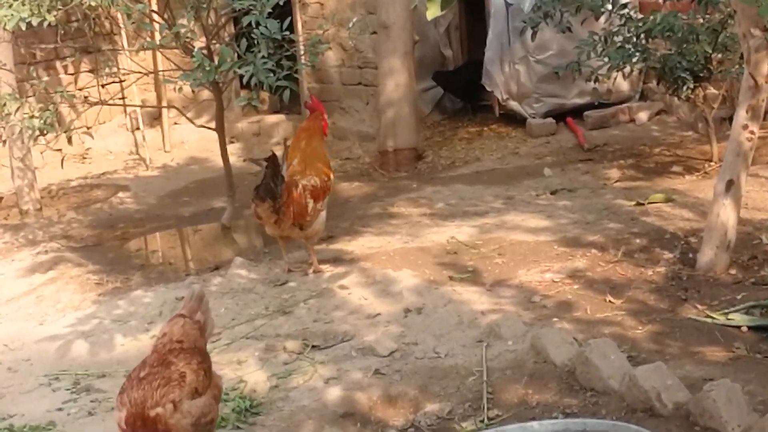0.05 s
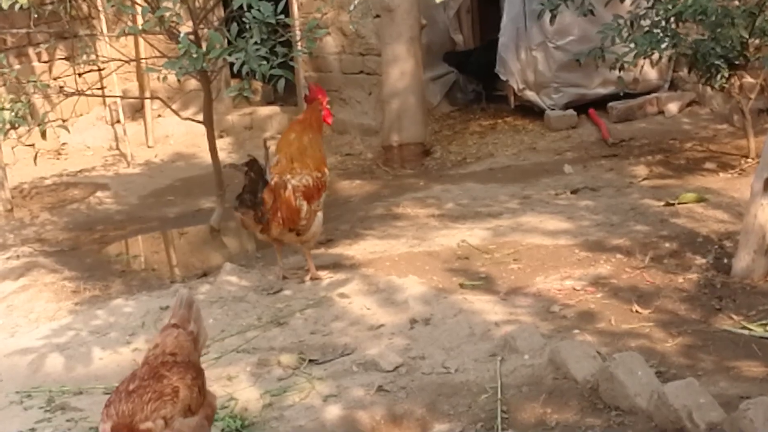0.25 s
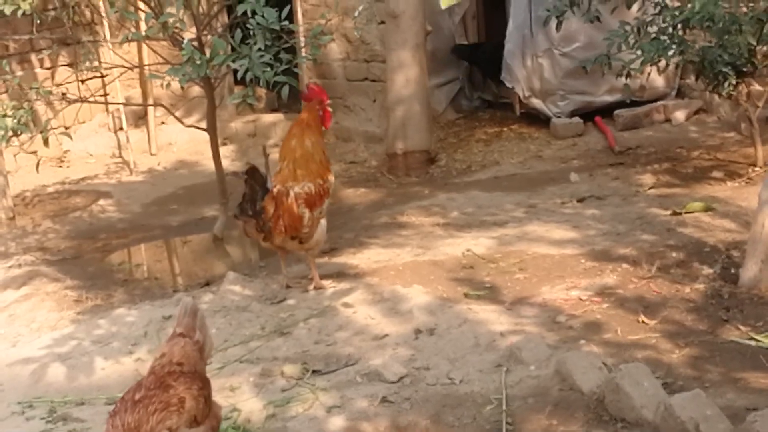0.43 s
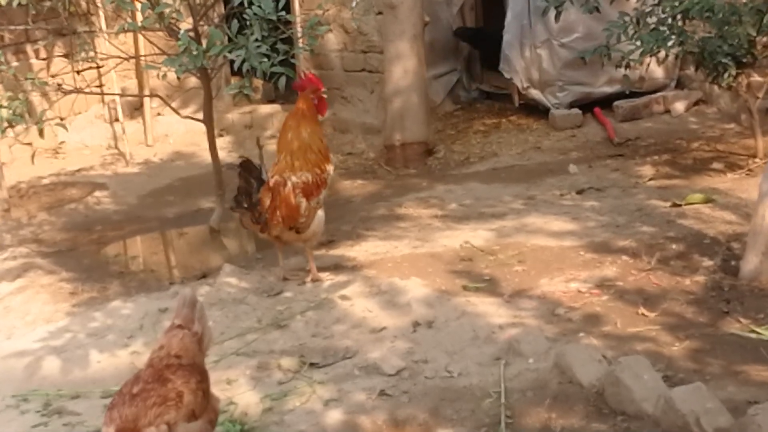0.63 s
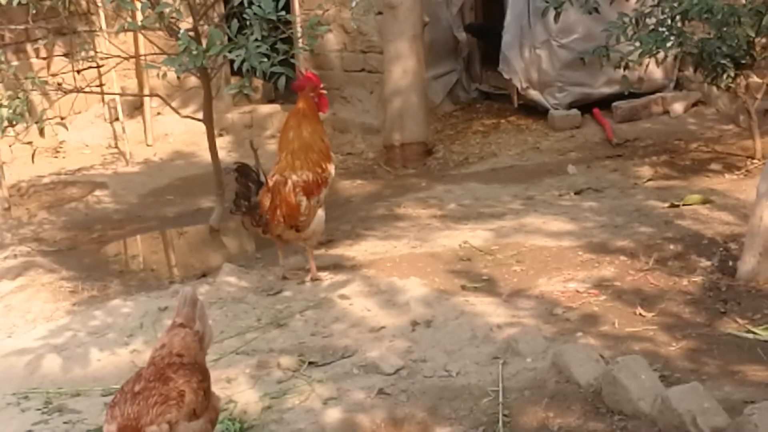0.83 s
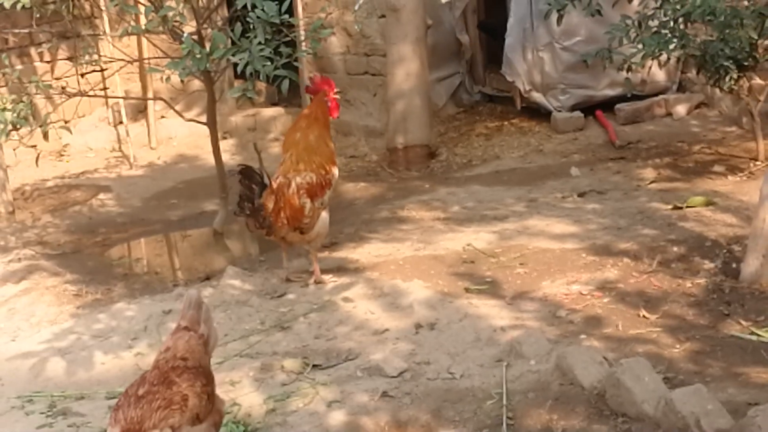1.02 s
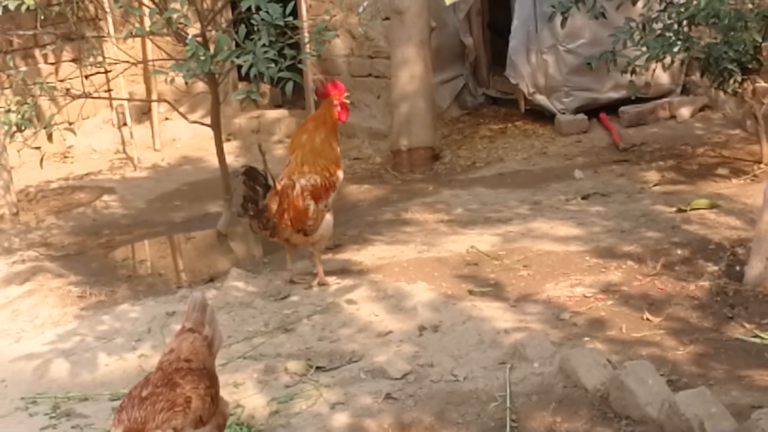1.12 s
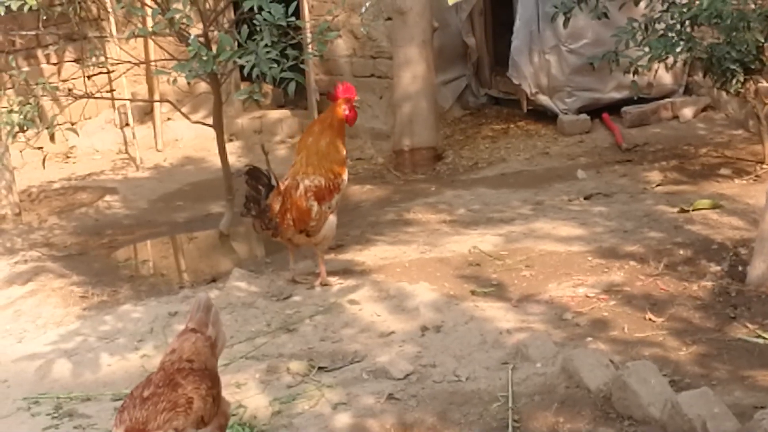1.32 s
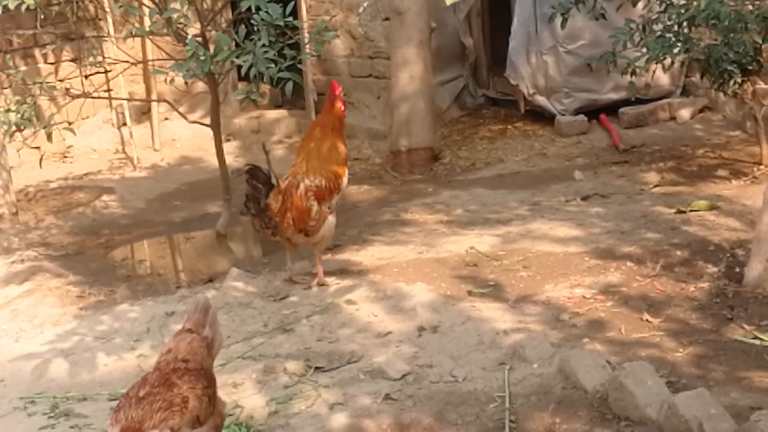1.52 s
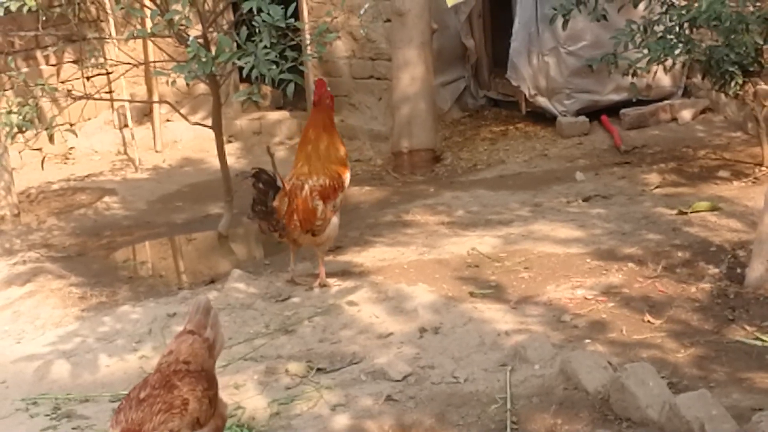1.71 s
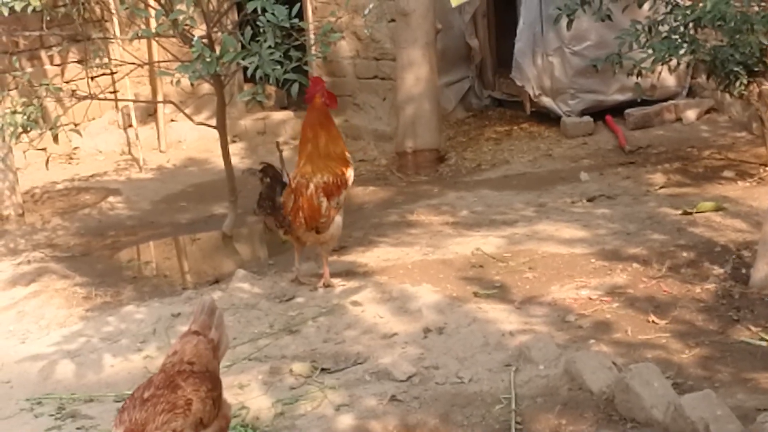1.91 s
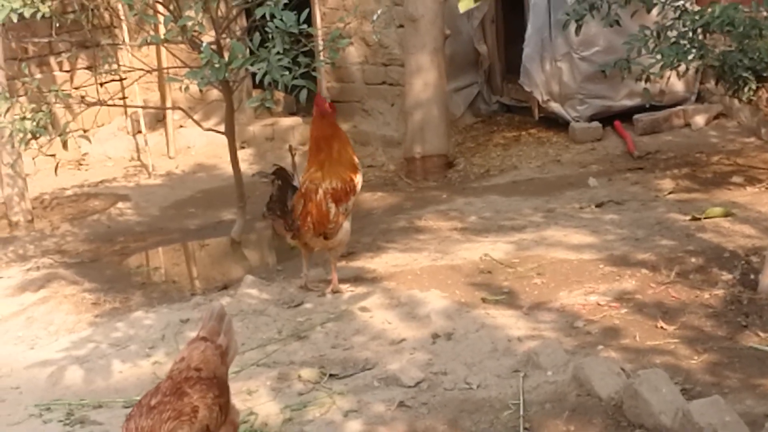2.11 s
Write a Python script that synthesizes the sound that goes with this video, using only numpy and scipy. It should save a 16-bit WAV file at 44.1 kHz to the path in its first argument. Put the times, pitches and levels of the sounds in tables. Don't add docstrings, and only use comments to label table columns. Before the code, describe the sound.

Close outdoor stereo pickup of a rooster's crow, short bark first, then a long strained call breaking hoarse, with short wall echoes, thin buzzy bird chirps at left, low wind rumble and a faint peck at the end.

```python
import sys
import numpy as np
from scipy import signal
from scipy.fft import rfft, irfft, next_fast_len
from scipy.io import wavfile
from scipy.ndimage import uniform_filter1d, map_coordinates

SR = 44100
rng = np.random.default_rng(int(sys.argv[2]) if len(sys.argv) > 2 else 0)


def boost(x):
    u = np.asarray(x, float) / 20
    return 10 ** u


def persist_wave(psi):
    counts = np.round(np.clip(psi, -1, 1) * 32767).astype(np.int16)
    wavfile.write(sys.argv[1], SR, np.atleast_2d(counts).T)


N = 94815

# frequency in Hz, level in dB per Hz.
AIR_COLOUR = [(15, -48), (25, -2), (144, -2), (300, -4.5), (600, -3), (1000, -10), (3500, -17),
              (15500, -23.5)]
# frequency in Hz, likeness 0-1.
AIR_ALIKE = [(40, .998), (90, .992), (180, .92), (350, .3), (1000, .1)]
# time in seconds, wind level in dB.
WIND_SWELL = [
    (0, 13.5),
    (.2, 1),
    (1.2, 3.5),
    (1.55, 8.5),
    (1.7, 3),
    (2.0, 5.5),
    (2.1, 15.5),
    (2.15, 14.5),
]
AIR_DB, WIND_TOP_HZ = -61.5, 160

# time in seconds, level in dB.
PECK_TIMES = [
    (0.073, -69),
    (2.073, -46.5),
]
# frequency in Hz, level in dB.
PECK_COLOUR = [(200, -65), (500, -20), (2200, -11), (3000, -34), (9000, -29.5), (15000, -56)]
PECK_T60_S = .05

# start in seconds, length in seconds, level in dB, pitch in Hz, low throat note in Hz.
CHIRPS = [
    (0.144, 0.074, -40.5, 10030, 4870),
    (0.242, 0.064, -37.5, 9640, 5070),
    (0.682, 0.066, -43.5, 10080, 4930),
    (1.275, 0.057, -34.5, 9490, 4745),
    (1.354, 0.061, -29.5, 9340, 3950),
    (1.435, 0.063, -30.5, 9196, 3720),
]
# frequency in Hz, level in dB.
BIRD_BREATH = [(2000, -97.5), (3200, -5.5), (5000, 2.5), (8000, 5), (9500, 16), (10500, -24), (11000, -59)]
RASP_DB, LOW_NOTE_DB = -14, -16.5
TRILL_HZ, TRILL_SWING_HZ, TRILL_DB = 65, 70, 1.5
BUZZ_HZ, GRAIN_DB, CHIRP_RISE_S = 260, 2.5, .012
SWOOP_HZ, SWOOP_S, HIGH_LATE_S = 900, .005, .008
BIRD_LEFT_DB, BIRD_WET_DB = 7, -3

# time in seconds, pitch in Hz, level in dB, beak opening from -1 to 2.
FIRST_NOTE = [(.226, 568, -39.5, 0.77), (.238, 605.5, -24.5, 0.66), (.275, 650.6, -21, 0.14),
              (.3, 701.2, -20.5, 0.24), (.325, 705.5, -24.5, 0.44), (.342, 668.3, -22, 0.39),
              (.39, 646.3, -21, 0.12), (.42, 600, -25.5, 0.11), (.44, 561.6, -32.5, 1)]
WAVER = [(.532, 508.5, -42.5, 1), (.546, 577.5, -26, 1.07), (.56, 729.7, -22.5, 1.6), (.578, 881, -27, 1.2),
         (.6, 906, -19.5, 1.1), (.635, 896, -23.5, 1.09), (.652, 785, -28.5, 1.24),
         (.668, 628.3, -27.5, 1.77), (.69, 621.5, -25.5, 0.43)]
SURGE = [(.705, 641.4, -24, 0.56), (.72, 764.4, -24.5, 0.27), (.74, 805, -24.5, .6),
         (.76, 881.4, -23.5, 0.74), (.785, 890, -26.5, 0.6)]
MIDDLE = [(.81, 883.4, -26, 0.37), (.84, 880.6, -25.5, 0.42), (.9, 902, -23, 0.34),
          (.955, 892.2, -25, 0.48), (.98, 873.6, -22.5, 0.1), (1.0, 856, -23, 0.22),
          (1.03, 852.4, -24.5, 0.68), (1.06, 868, -26, 0.64)]
LONG_CALL = [(1.085, 900.5, -24, 0.2), (1.17, 905.2, -24, -.95), (1.3, 896, -25.5, 0.4),
             (1.4, 883.6, -28, 0.07), (1.462, 880, -26.5, 0.5), (1.467, 837.7, -29, 2),
             (1.58, 836.7, -28, 1.5), (1.66, 847.9, -26, 1.26), (1.72, 836.6, -31.5, 1.33)]
DYING = [(1.764, 810, -30, 1.1), (1.765, 690, -26, .8), (1.8, 645, -27, .8), (1.825, 615, -27, .8),
         (1.845, 540, -26, .6), (1.852, 515, -40, .6), (1.86, 510, -30, .8)]
# start in seconds, end in seconds.
VOICED = [
    (0.227, 0.44),
    (0.532, 1.8515),
]
# start in seconds, end in seconds, chaos 0-1, quaver in cycles.
BREAKS = [(.22, .45, .008, .04), (.285, .335, .015, .06), (.53, .575, .1, .05), (.58, .72, .012, .025),
          (.64, .67, .1, .06), (.722, .805, .4, .18), (.8, .96, .012, .014), (1.0, 1.075, .4, .18),
          (1.07, 1.3, .008, .004), (1.63, 1.76, .02, .014), (1.765, 1.865, .05, .07)]
# start in seconds, end in
# seconds, depth 0-1, lateness in cycles.
HALVING = [
    (0.702, 0.79, 0.57, 0.018),
    (0.81, .93, 0.04, 0.0021),
    (1, 1.078, 0.43, 0.023),
    (1.037, 1.292, 0, 0.0072),
    (1.672, 1.746, 0.26, .004),
]
# start in seconds, end in seconds, rate in Hz, depth 0-1.
FLUTTER = [
    (1.3, 1.48, 71, 0.1),
    (1.625, 1.69, 155, 0.21),
    (.8, .97, 41, 0.41),
    (1.69, 1.76, 40, 0.23),
]
JITTER, CHAOS_JITTER = .002, .3
SHIMMER_DB, CHAOS_DB, CHAOS_GAIN_DB = .2, 2.5, -3.5
BREATH_DB, QUAVER_HZ = -35, 90
ATTACK_S, RELEASE_S = 0.0022, 0.011

# frequency in Hz, width in Hz, level in dB.
THROAT_HELD = [(890, 39, -3.5), (1723, 184, 0), (2582, 380, -11), (3380, 110, -52), (5798, 210, -2),
               (6800, 350, -12), (8800, 760, -33), (12970, 2600, -32)]
THROAT_NARROW = [(880, 70, -16), (1654, 174, 3.5), (2303, 230, -7), (3440, 58, -2.5), (5880, 190, -1),
                 (6580, 3030, -20), (9970, 550, -30), (13400, 2600, -105)]
THROAT_WIDE = [(760, 103, -2.5), (1571, 302, 2.5), (2287, 246, 4), (3368, 173, -2.5), (6880, 78, -26.5),
               (6920, 230, -16), (9180, 340, -27.5), (11100, 13000, -75)]
THROAT_STRETCHED = [(850, 64, -15.5), (1694, 158, 6.5), (2350, 300, -35), (3460, 225, 6.5),
                    (6020, 400, -15.5), (6630, 56, -5), (7800, 4500, -27), (11624, 2500, -53)]
# frequency in Hz, floor width in Hz, full width in Hz.
POCKETS = [(3100, 150, 336), (4045, 280, 820), (4880, 200, 1420), (11270, 560, 700)]
THROAT_CUT_HZ = 700
# start in seconds, end in seconds, frequency in Hz, share 0-1.
SACS = [
    (.27, .45, 2700, 0.56),
    (0.538, 0.678, 2640, 0.78),
    (1.077, 1.431, 3630, 0.83),
    (1.464, 1.58, 2590, 0.88),
    (1.454, 1.586, 4100, 0.53),
]
SAC_WIDTH_HZ, SAC_CLOSE_S = 316, 0.042

# start in seconds, end in seconds, pitch in Hz, level in dB.
SECOND_SIDE = [
    (0.26, 0.422, 722.5, -42),
    (1.775, 1.865, 2311, -36),
    (1.755, 1.79, 790, -33),
    (.66, .71, 1800, -38),
]
# start in seconds, end in seconds, pitch in Hz, level in dB.
HEN_COOS = [
    (1.12, 1.2, 318, -66),
    (1.233, 1.37, 351.5, -69),
]

# frequency in Hz, left over right in dB.
PORTS = [(500, 5), (900, -4.5), (1700, 6.5), (2500, -19), (3500, -4.5), (6000, 1), (10000, 10.5),
         (13000, 1.5)]
# time in seconds, left over right in dB.
FACING = [(.2, 0), (.5, 2), (0.799, 0), (1.1, -1), (1.449, 6.5), (1.7, -1.5), (1.9, 3.5)]
LEFT_LAG_S = 0.00012

# frequency in Hz, time to fall by 60 dB in seconds.
YARD_RING = [(300, 1), (1000, 0.21), (2500, 0.42), (6000, 0.36), (12000, 0.29)]
# frequency in Hz, likeness 0-1.
ECHO_ALIKE = [(900, .55), (1500, .2)]
WET_DB, PREDELAY_S, HEAD_TURN_S = -4.5, .012, 0.2623

# frequency in Hz, level in dB.
MASK = [(1000, -23.5), (2500, -37.5), (4500, -18.5), (10000, -26), (15000, -23.5)]
MASK_UP_DB, MASK_DOWN_DB = 10, 20
# frequency in Hz, level in dB.
MIC = [(9000, 0), (12000, -3.5), (15500, -12)]


def unit(x):
    return x / np.sqrt(np.mean(x ** 2) + 1e-20)


def along(points, hz):
    f, v = np.transpose(points)
    return np.interp(np.log(hz + 1), np.log(f + 1), v)


def gate(t, start, end, rise=0.0185, fall=0.007):
    return np.clip((t - start) / rise, 0, 1) * np.clip((end - t) / fall + 1, 0, 1)


def wobble(rate):
    knots = rng.standard_normal(int(N * rate / SR) + 4)
    return map_coordinates(knots, [np.arange(N) * rate / SR])


def filtered(x, response):
    m = next_fast_len(N + SR // 2)
    return irfft(rfft(x, m) * response(np.fft.rfftfreq(m, 1 / SR)), m)[..., :N]


def resonance(f, centre, width):
    return 1j * f * width / (centre * centre - f * f + 1j * f * width)


def air():
    def mid_side(hz):
        turn = np.arccos(np.clip(along(AIR_ALIKE, hz), -1, 1)) / 2
        return boost(along(AIR_COLOUR, hz)) * [np.cos(turn), np.sin(turn)]

    mid, side = filtered(rng.standard_normal((2, N)), mid_side)
    pair = unit(np.array([mid + side, mid - side]))
    wind = filtered(pair, lambda hz: 1 / (1 + (hz / WIND_TOP_HZ) ** 4))
    swell_db = np.interp(np.arange(N) / SR, *np.transpose(WIND_SWELL))
    gusts = wind * boost(swell_db + 1.6 * wobble(5.9))
    return (pair - wind + gusts) * boost(AIR_DB)


def pecks():
    t = np.arange(N) / SR
    burst = unit(filtered(rng.standard_normal(N), lambda f: boost(along(PECK_COLOUR, f))))
    return burst * sum(boost(db - 60 * np.abs(t - s) / PECK_T60_S) * (t > s) for s, db in PECK_TIMES)


def bird():
    t, out = np.arange(N) / SR, np.zeros(N)
    rasp = unit(filtered(rng.standard_normal(N), lambda f: boost(along(BIRD_BREATH, f))))
    for s, length, db, hz, low_hz in CHIRPS:
        trill = np.cos(2 * np.pi * TRILL_HZ * (t - s))
        swoop = SWOOP_HZ * np.exp(-np.abs(t - s - HIGH_LATE_S) / SWOOP_S)
        buzz = BUZZ_HZ * np.abs(wobble(500))
        high_hz = hz + 400 - swoop - 1500 * (t - s) - TRILL_SWING_HZ * trill - buzz
        high = np.sin(2 * np.pi * np.cumsum(high_hz) / SR)
        high *= gate(t, s + HIGH_LATE_S, N, 0.0047) * boost(-TRILL_DB * trill + GRAIN_DB * wobble(400))
        low = np.sin(2 * np.pi * np.cumsum(low_hz + 0.91 * BUZZ_HZ * wobble(700)) / SR)
        low *= boost(LOW_NOTE_DB + GRAIN_DB * wobble(200))
        tone = high + low + boost(RASP_DB) * rasp
        out += boost(db) * tone * gate(t, s, s + length, CHIRP_RISE_S, 0.007)
    return out


def membrane_pulses(cycles):
    t = np.arange(N) / SR
    k = np.arange(1, int(cycles[-1]) - 2)
    at = np.interp(k, cycles, t)
    chance = rng.standard_normal((3 * N // 100, 2))[:len(k)]
    chaos = sum(c * gate(at, a, b) for a, b, c, q in BREAKS)
    quaver = sum(q * gate(at, a, b) for a, b, c, q in BREAKS)
    quaver = quaver * np.interp(at, t, wobble(QUAVER_HZ))
    every_second = (-1) ** k
    late = every_second * sum(c * gate(at, a, b, 0.04, 0.021) for a, b, d, c in HALVING)
    scatter = (JITTER + CHAOS_JITTER * chaos) * chance[:, 0]
    when = np.interp(k + quaver + late + scatter, cycles, t) * SR

    size = boost((SHIMMER_DB + CHAOS_DB * chaos) * chance[:, 1] + CHAOS_GAIN_DB * chaos)
    size = size * (1 + every_second * sum(d * gate(at, a, b, 0.052, 0.029) for a, b, d, c in HALVING))
    size = size * (1 + sum(d * gate(at, a, b) * np.sin(2 * np.pi * hz * at) for a, b, hz, d in FLUTTER))

    index = np.floor(when)[:, None].astype(int) + np.arange(-15, 17)
    u = index - when[:, None]
    taps = size[:, None] * np.sinc(u) * np.cos(np.pi * u / 32) ** 2
    return unit(np.bincount(np.clip(index, 0, N - 1).ravel(), taps.ravel(), N))


def throat(x, peaks):
    def response(f):
        r = f / THROAT_CUT_HZ
        cut = (1j * r) ** 2 / (1 - r ** 2 + .8j * r)
        dips = np.prod([(c * c - f * f + 1j * f * v) / (c * c - f * f + 1j * f * w) for c, v, w in POCKETS], axis=0)
        rings = sum((-1) ** k * boost(db) * resonance(f, c, w) for k, (c, w, db) in enumerate(peaks))
        return cut ** 3 * dips * rings

    return filtered(x, response)


def air_sacs(x):
    t = np.arange(N) / SR
    swallowed = 0
    for a, b, hz, share in SACS:
        band = filtered(x, lambda f: resonance(f, hz, SAC_WIDTH_HZ))
        swallowed = swallowed + np.clip(share, 0, 1) * gate(t, a, b, .012, SAC_CLOSE_S) * band
    return x - swallowed


def rooster():
    t = np.arange(N) / SR
    crow = [*FIRST_NOTE, *WAVER, *SURGE, *MIDDLE, *LONG_CALL, *DYING]
    s, *cols = np.transpose(crow)
    pitch, level_db, beak = [np.interp(t, s, c) for c in cols]
    unsteady = 1 + 0.001745 * wobble(30.31)
    cycles = np.cumsum(uniform_filter1d(pitch, size=100) * unsteady) / SR
    breath = boost(BREATH_DB) * rng.standard_normal(N) * (1 + np.cos(2 * np.pi * cycles))
    source = membrane_pulses(cycles) + breath
    shape = np.clip(beak, -1, 2) + 1
    voice = 0
    for i, peaks in enumerate((THROAT_HELD, THROAT_NARROW, THROAT_WIDE, THROAT_STRETCHED)):
        share = np.clip(1 - np.abs(shape - i), 0, 1)
        voice = voice + share * throat(source, peaks)
    sounding = sum(gate(t, a, b, ATTACK_S, RELEASE_S) for a, b in VOICED)
    return air_sacs(unit(voice)) * boost(level_db) * sounding


def unsteady_tones(notes):
    t, out = np.arange(N) / SR, np.zeros(N)
    for a, b, hz, db in notes:
        tone = np.sin(2 * np.pi * np.cumsum(hz + 12 * wobble(49.57)) / SR)
        out += boost(db + 3.4 * wobble(60)) * gate(t, a, b, 0.013, 0.0069) * tone
    return out


def second_side():
    return unsteady_tones(SECOND_SIDE)


def hen():
    return unsteady_tones(HEN_COOS)


def ports(x):
    side = np.array([[1], [-1]])

    def response(f):
        return boost(side * along(PORTS, f) / 2) * np.exp(-1j * np.pi * f * side * LEFT_LAG_S)

    facing_db = np.interp(np.arange(N) / SR, *np.transpose(FACING))
    return boost(side * facing_db / 2) * filtered(np.array([x, x]), response)


def yard(x):
    out, t = np.zeros((2, N)), np.arange(N) / SR
    for s in np.arange(0, N / SR + HEAD_TURN_S, HEAD_TURN_S):
        hz, u, z = signal.stft(rng.standard_normal((2, SR // 2)), SR, nperseg=256)
        alike = along(ECHO_ALIKE, hz)[:, None]
        z = np.array([z[0], alike * z[0] + np.sqrt(1 - alike ** 2) * z[1]])
        fade = boost(-60 * u / along(YARD_RING, hz)[:, None])
        tail = signal.istft(z * fade, SR, nperseg=256)[1]
        tail = tail / np.linalg.norm(tail[0])
        part = x * np.cos(np.pi / 2 * np.clip((t - s) / HEAD_TURN_S, -1, 1))
        delayed = np.pad(part, (int(PREDELAY_S * SR), 0))
        out += signal.fftconvolve(delayed[None], tail, axes=1)[:, :N]
    return out


def scene():
    ground = rooster() + second_side() + hen() + pecks()
    small = bird()
    left = boost([[BIRD_LEFT_DB], [-BIRD_LEFT_DB]])
    echoes = yard(boost(WET_DB) * ground + boost(BIRD_WET_DB) * small)
    return ports(ground) + small * left + echoes + air()


def masked_out(x):
    hz, _, z = signal.stft(x, SR, nperseg=2048)
    bark = 13 * np.arctan(hz / 1316) + 3.5 * np.arctan((hz / 7500) ** 2)
    band = (bark * 2 + hz / 500).astype(int)
    member = band == np.arange(band.max() + 1)[:, None]
    count = member.sum(1)
    centre, centre_hz = member @ bark / count, member @ hz / count
    level = (member @ np.mean(np.abs(z) ** 2, axis=0) / count[:, None]) ** .5
    step = centre[:, None] - centre
    spread = boost(-np.where(step > 0, MASK_UP_DB * step, -MASK_DOWN_DB * step))
    neighbours = (spread ** 2 @ level ** 2) ** .5
    chance_db = 3.5 * uniform_filter1d(rng.standard_normal(level.shape), size=2)
    mask = boost(along(MASK, centre_hz)[:, None] + chance_db) * neighbours
    return signal.istft(z * (level > mask)[band], SR, nperseg=2048)[1][:, :N]


def band_limit(x):
    return signal.sosfilt(signal.butter(12, 15670, fs=SR, output="sos"), x)


def record(dry):
    heard = filtered(dry, lambda f: boost(along(MIC, f)))
    return band_limit(masked_out(heard))


dry = scene()
out = record(dry)
persist_wave(out)
```